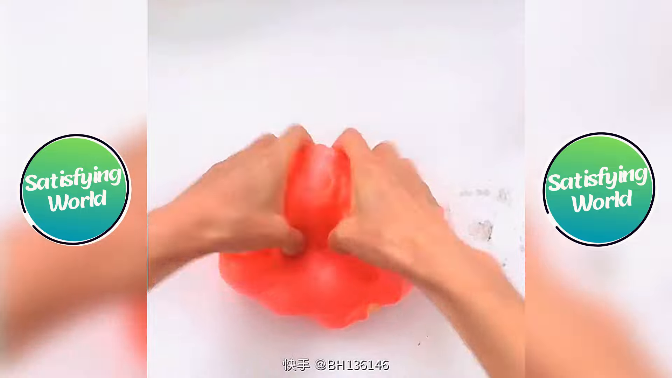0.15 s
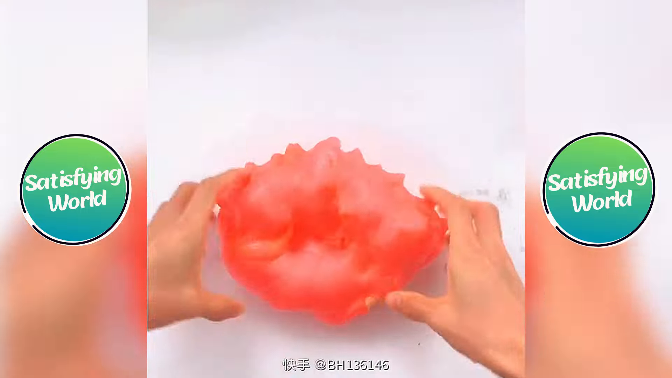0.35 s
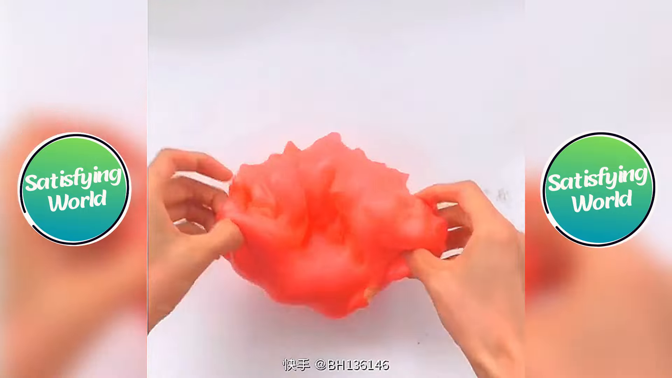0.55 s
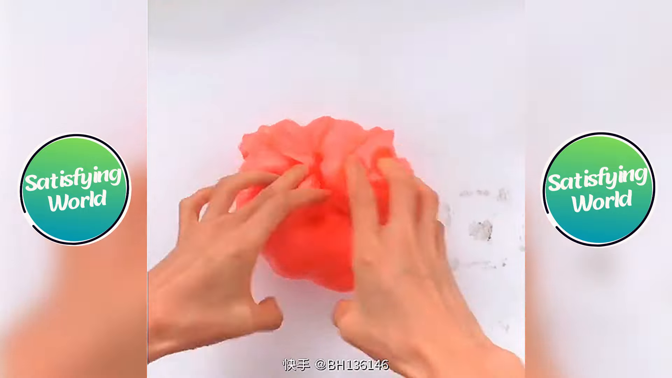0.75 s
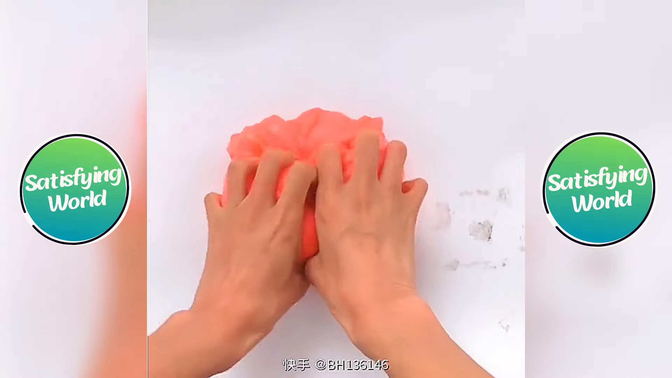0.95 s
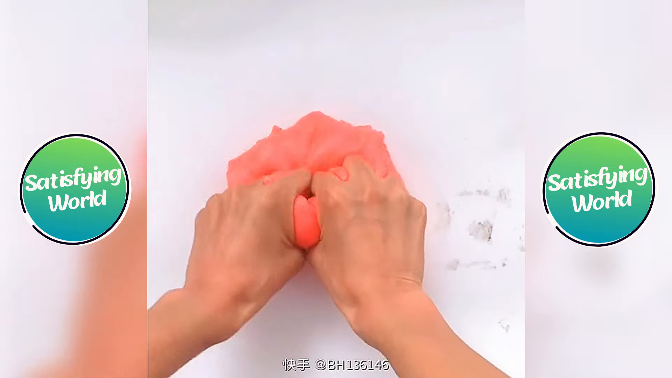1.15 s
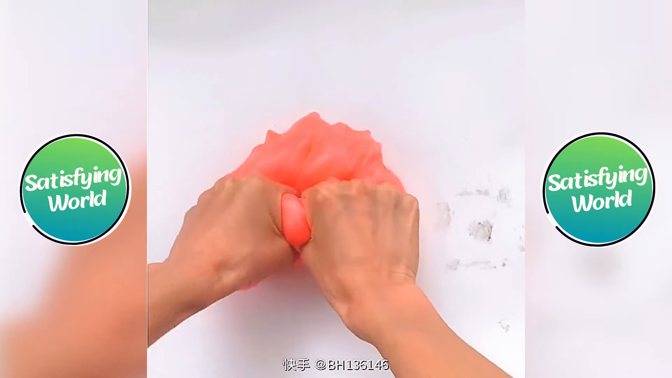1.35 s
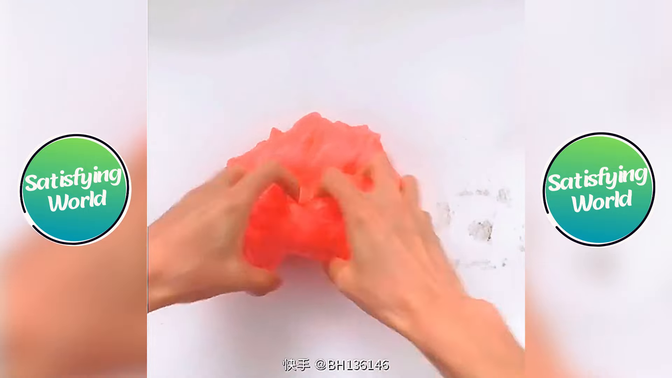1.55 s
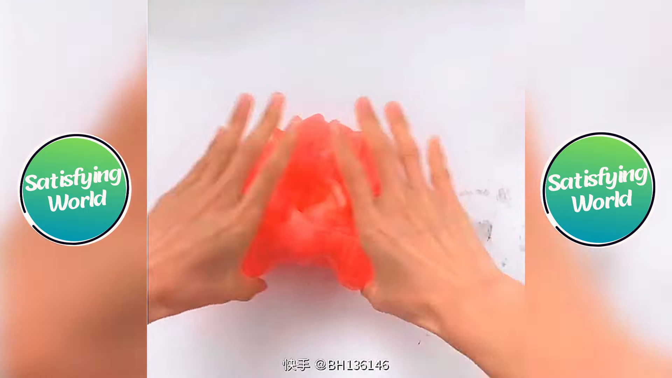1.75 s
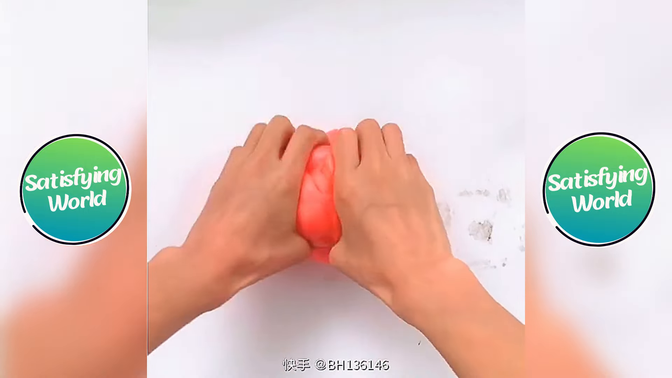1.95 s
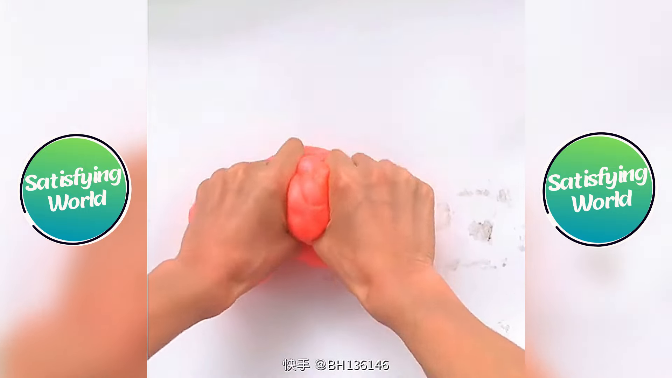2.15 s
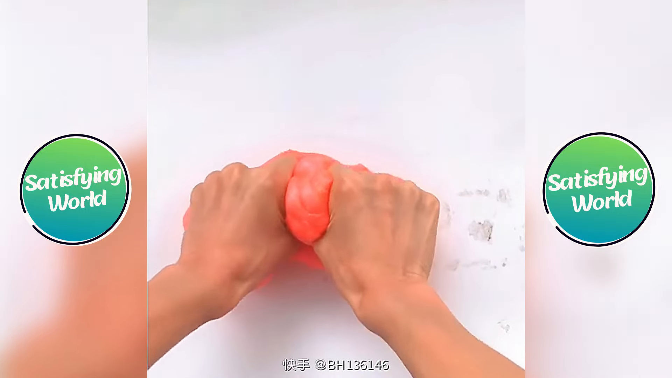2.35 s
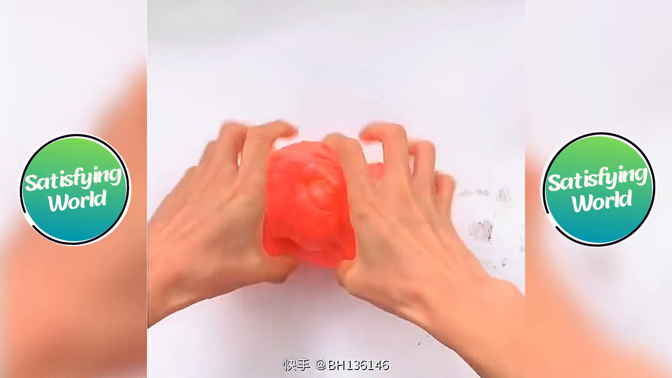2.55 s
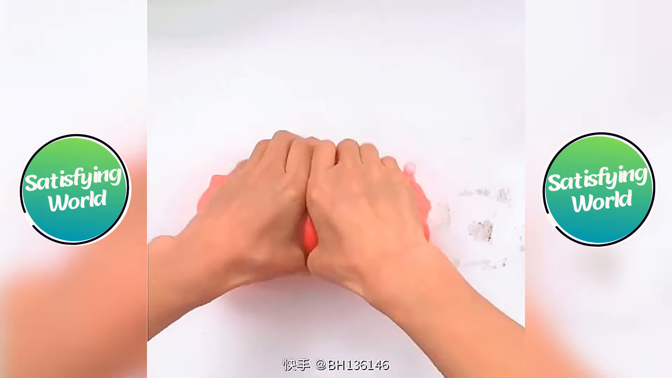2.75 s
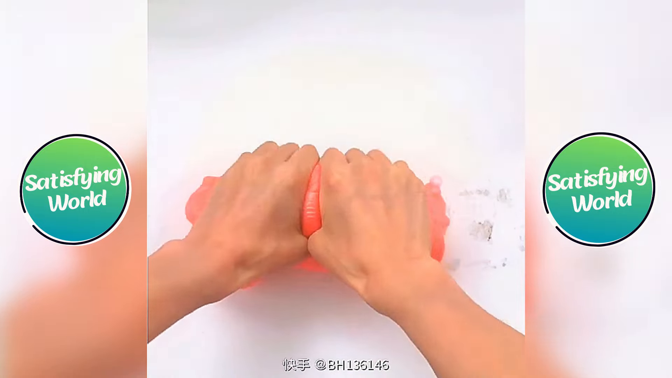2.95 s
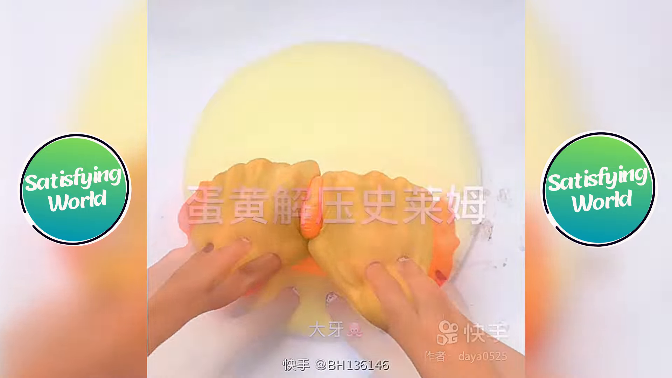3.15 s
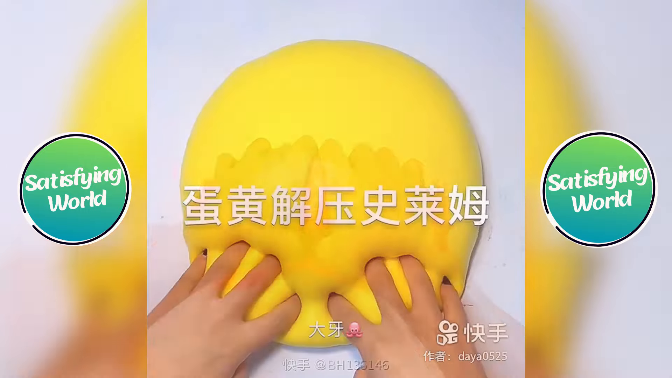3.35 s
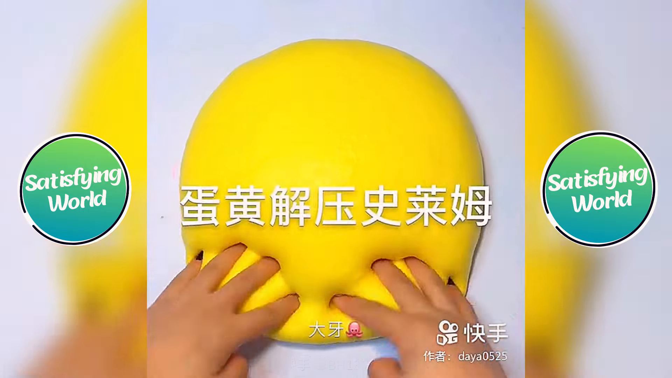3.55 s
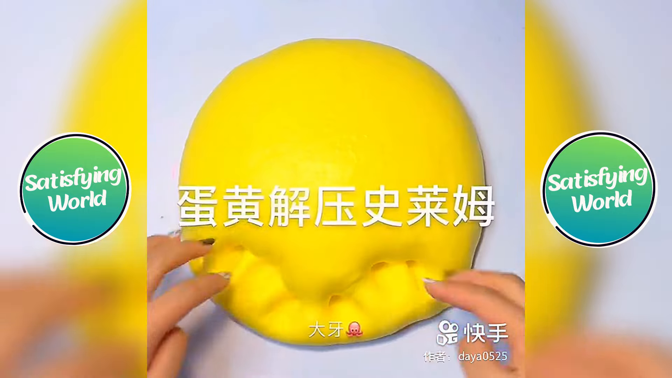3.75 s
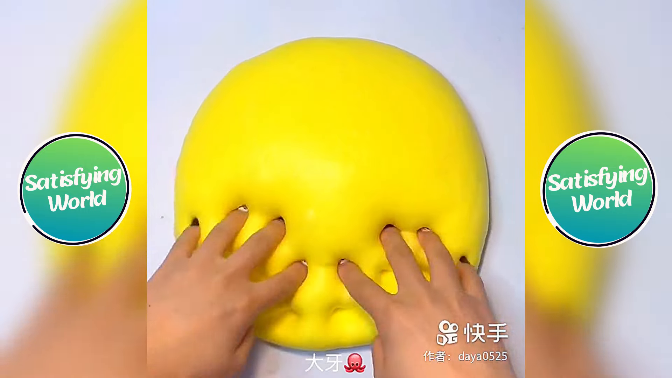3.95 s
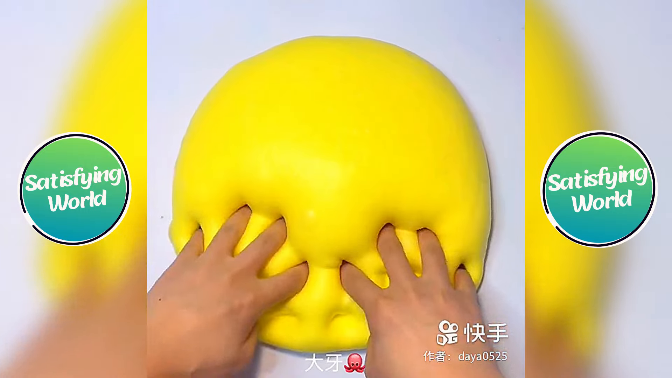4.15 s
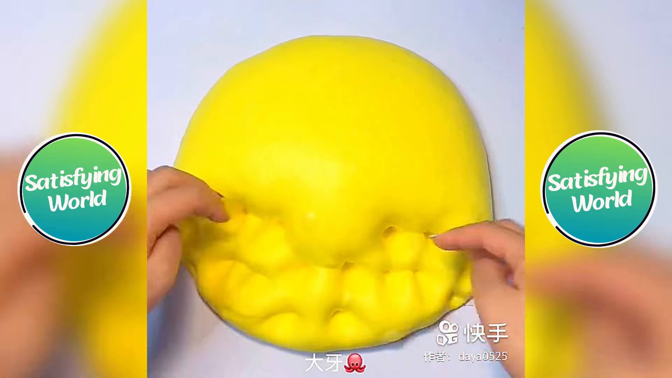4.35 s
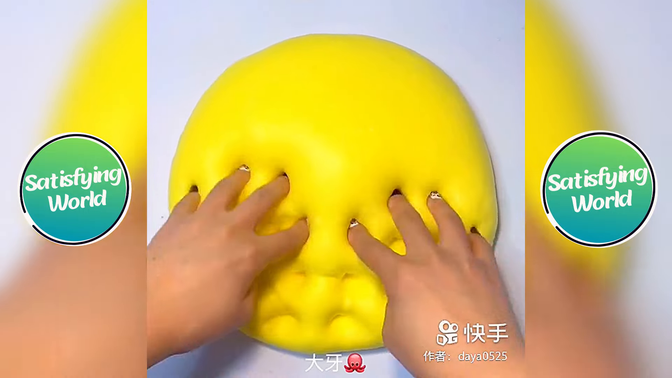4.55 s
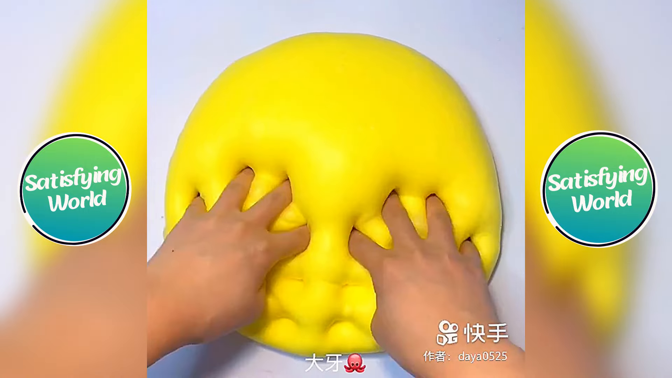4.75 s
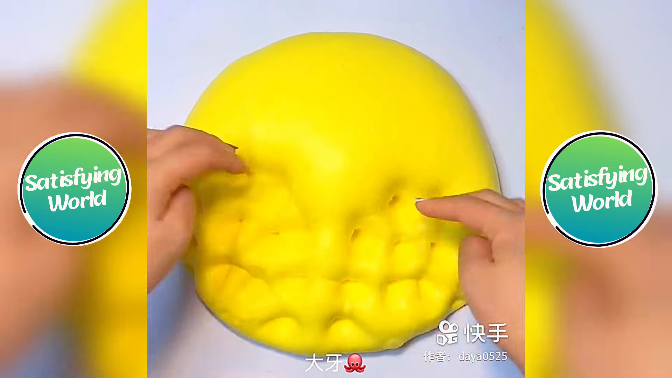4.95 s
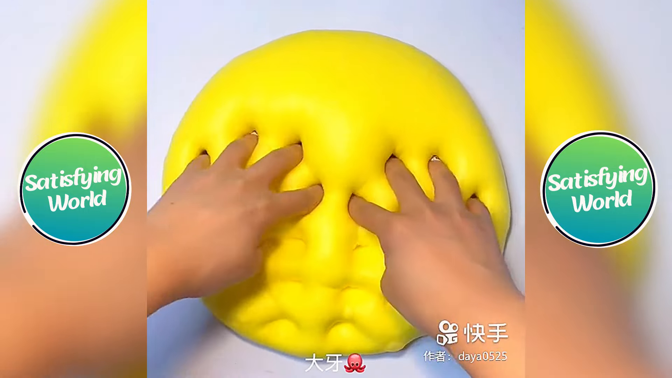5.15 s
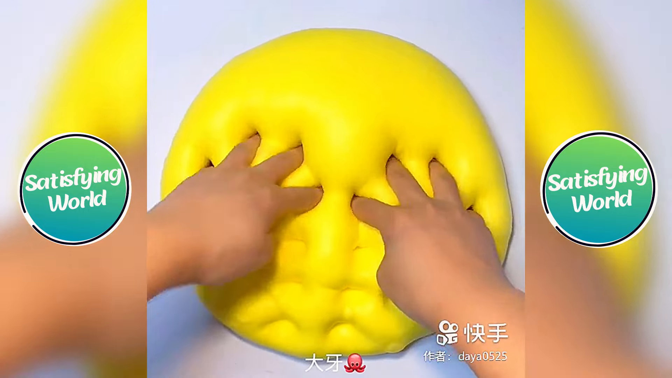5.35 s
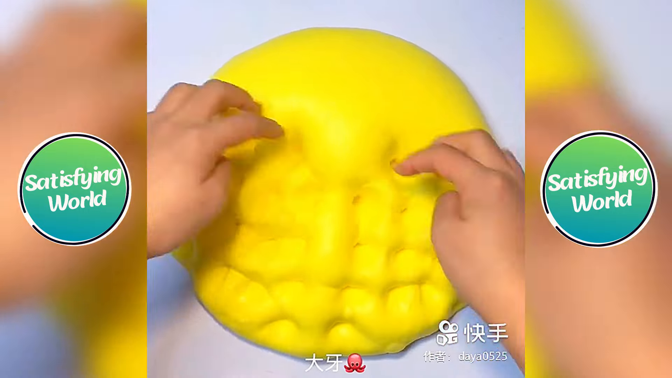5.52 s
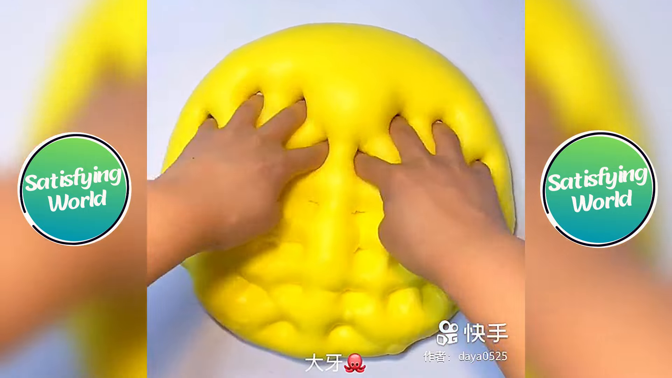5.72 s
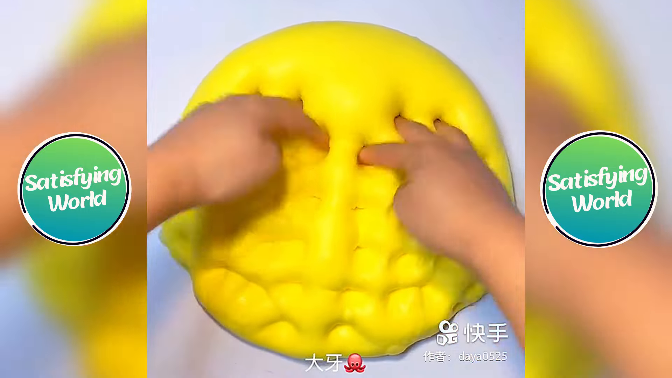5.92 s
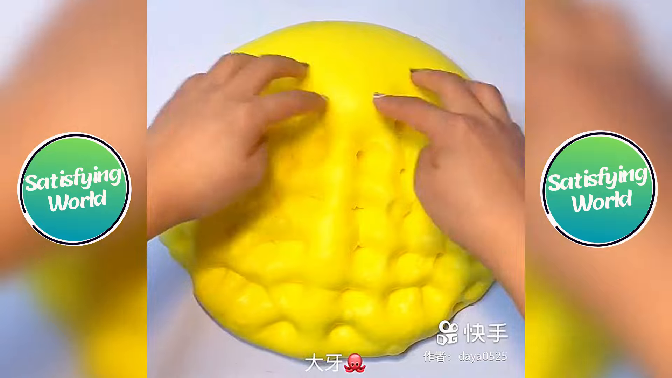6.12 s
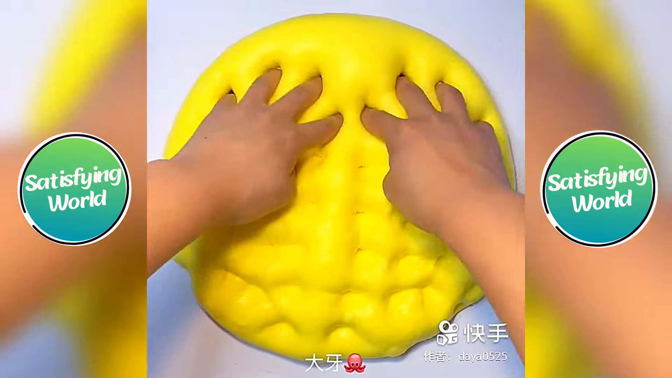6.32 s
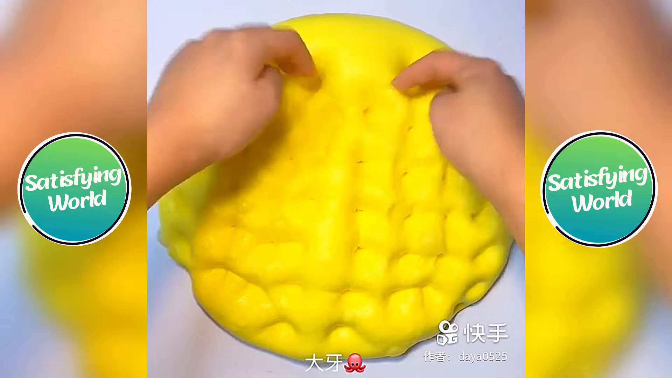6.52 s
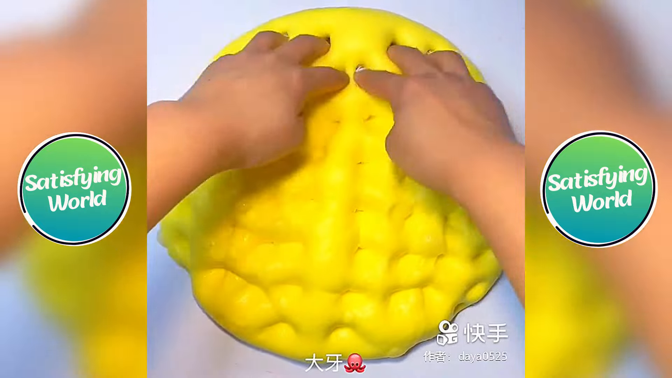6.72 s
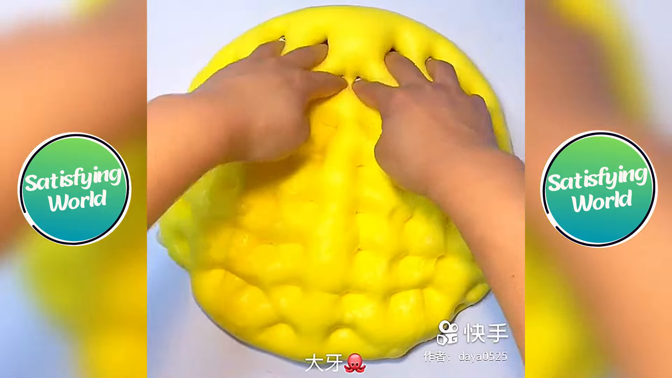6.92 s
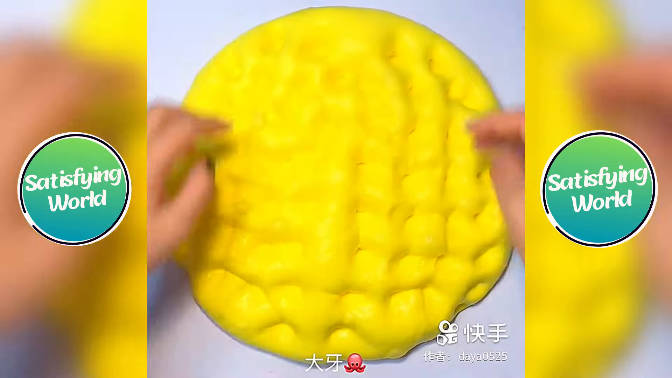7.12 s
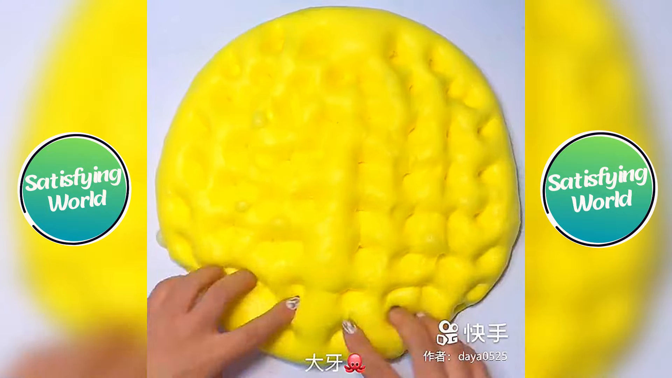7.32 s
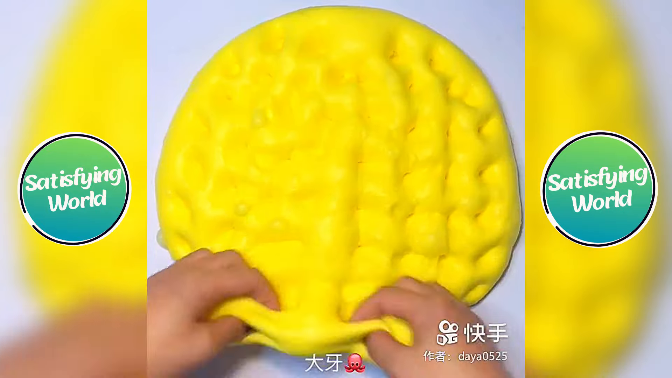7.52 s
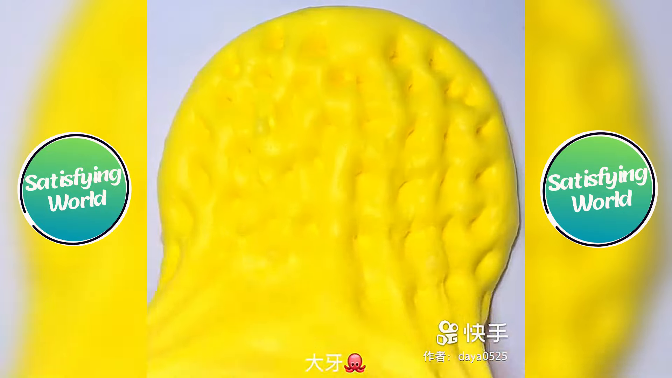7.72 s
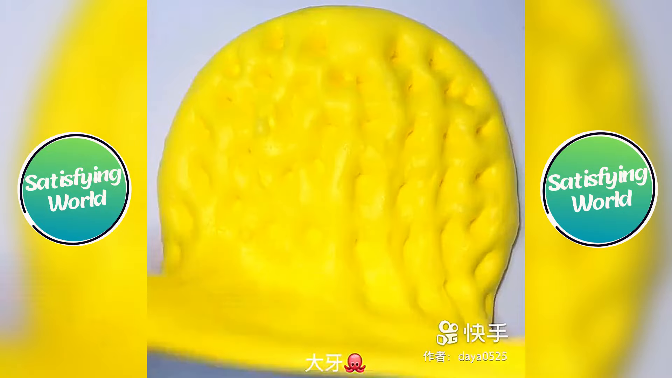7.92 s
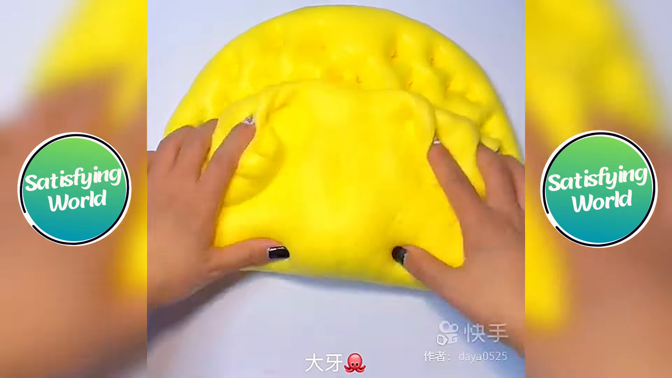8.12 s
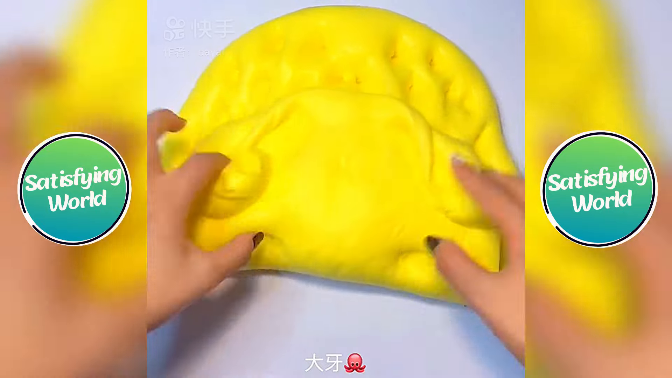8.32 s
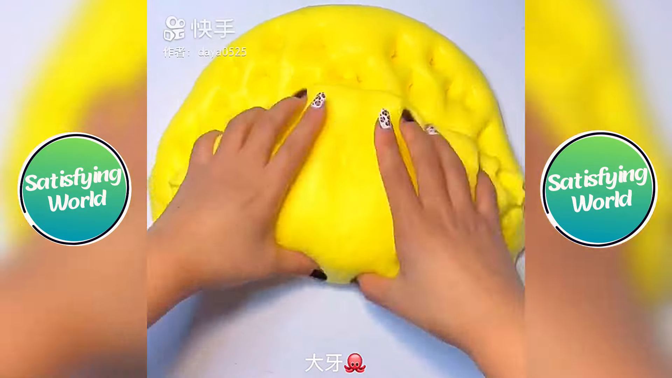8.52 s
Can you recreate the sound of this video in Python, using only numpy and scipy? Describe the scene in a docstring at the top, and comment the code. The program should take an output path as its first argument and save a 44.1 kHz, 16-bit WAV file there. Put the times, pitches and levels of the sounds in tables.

```python
"""Two hands knead a wet slime on a table: filtered ruptures squelch and crackle, and small air bubbles snap.
Then fingers sink into a thick, fluffy slime and pull out seven times; each hole opens with loud suction pops,
made of a rip of noise, a falling cavity note and a thud, and a hollow note lingers after the last three pulls.
The slab is peeled off the table and flopped over. A soft hush runs throughout; in the thick slime's part the
small room also rings low, and the close microphone overloads on the loudest pops."""
import sys
import numpy as np
from scipy import signal
from scipy.fft import rfft, irfft
from scipy.io import wavfile
from scipy.ndimage import uniform_filter1d

SR = 44100
rng = np.random.default_rng(int(sys.argv[2]) if len(sys.argv) > 2 else 0)


def persist_wave(psi):
    """Save psi, clipped to +-1, as 16-bit WAV."""
    counts = np.round(np.clip(psi, -1, 1) * 32767).astype(np.int16)
    wavfile.write(sys.argv[1], SR, np.atleast_2d(counts).T)


N = 378378

# Suction pops and slaps, with levels before the common gains of the layers that use them.
# Each row: start in seconds, tear level in dB, tear pitch in Hz, cavity level in dB, cavity pitch in Hz.
SUCTION_POPS = [(3.6678, -8.5, 2600, -11.5, 320), (3.6986, -6, 5260, -16.5, 365),
                (3.7097, -8.5, 7900, -20.5, 478), (3.714, -8.5, 8660, -19, 484),
                (3.7215, -17, 6050, -14.5, 294), (3.74, -8, 5245, -14.5, 454), (4.359, -2, 6150, -13, 513),
                (4.3853, -13, 2200, -22, 486), (4.401, -12.5, 7300, -21, 530),
                (4.4064, -6.5, 7250, -12, 348), (4.427, -13.5, 7120, -15.5, 248),
                (4.9576, -6, 9040, -11, 333), (4.9824, -3.5, 6810, -10.5, 285),
                (5.004, -11, 3320, -8.5, 335), (5.0136, -8.5, 6530, -36, 474), (5.5113, -9, 8030, -14, 309),
                (5.5289, -6, 7380, -9.5, 214), (5.545, -7.5, 4970, -11, 223),
                (5.5555, -7.5, 5460, -11, 426), (5.58, -11, 5490, -29, 203), (5.603, -24, 1060, -16, 325),
                (6.0444, -7.5, 4125, -7, 228), (6.057, -6, 8000, -19, 313), (6.066, -9, 6210, -8, 212),
                (6.0765, -7, 7980, -10, 391), (6.0913, -8, 7860, -14, 473),
                (6.116, -11.5, 1440, -13.5, 443), (6.581, -7, 6440, -13.5, 289),
                (6.585, -14.5, 5710, -17.5, 344), (6.6033, -9.5, 1166, -6, 424),
                (6.605, -10.5, 9000, -19, 430), (6.6137, -6, 6670, -21, 366), (6.626, -12, 7110, -5.5, 399),
                (6.6469, -9, 8300, -12, 530), (7.0744, -8.5, 6300, -7, 400), (7.0927, -14, 6520, -7, 410),
                (7.103, -9, 1360, -12.5, 427), (7.1233, -11.5, 1924, -10, 574),
                (7.608, -22, 3310, -22.5, 460), (7.614, -21.5, 3700, -12.5, 502),
                (8.167, -16, 1150, -17, 418), (8.1737, -5.5, 3300, -6.5, 279.6),
                (8.189, -15.5, 1310, -1.5, 190), (8.438, -22, 1640, -21, 184),
                (8.456, -23.5, 1100, -12, 205)]
# Spectrum of a rip in the thick film. Each row: frequency in Hz, relative density in dB per Hz.
THICK_TEAR_COLOUR = [(300, 1.5), (780, -5), (1250, 6), (2500, -2.5), (5000, 1), (8500, -1), (11000, -5.5),
                     (15500, -16)]
# The thick slime takes over from the wet one between these times in seconds.
CHANGE_START_S, CHANGE_END_S = 3.08, 3.62


def from_db(db):
    """Level to amplitude: 20 dB is a factor of ten."""
    return 10 ** (np.asarray(db) / 20)


def rms_one(x):
    """Normalisation of effective value: scale to an rms of 1."""
    return x / np.sqrt(np.mean(x ** 2) + 1e-20)


def at_hz(points, hz):
    """Logarithmic frequency scale: interpolate a table evenly per octave."""
    frequencies, values = np.transpose(points)
    return np.interp(np.log(np.maximum(hz, 1)), np.log(frequencies), values)


def coloured(x, spectrum):
    """Minimum-phase filtering: the folded cepstrum of a spectrum gives a causal response; rms 1."""
    size = 4096
    gain = from_db(at_hz(spectrum, np.fft.rfftfreq(size, 1 / SR)))
    cepstrum = irfft(np.log(gain))
    folded = np.r_[cepstrum[0], 2 * cepstrum[1:size // 2]]
    response = irfft(np.exp(rfft(folded, size)))
    return rms_one(signal.fftconvolve(x, response)[:len(x)])


def drift(rate):
    """Slow random modulation: straight lines join `rate` random levels a second; rms 1."""
    knots = rng.standard_normal(int(N / SR * rate) + 2)
    return rms_one(np.interp(np.arange(N) / SR * rate, np.arange(len(knots)), knots))


def resonance(x, hz, width):
    """Damped oscillator: a two-pole resonance, bandwidth in Hz, with a gain of 1 at its peak."""
    radius = np.exp(-np.pi * width / SR)
    feedforward = np.array([1, 0, -1]) * (1 - radius ** 2) / 2
    feedback = [1, -2 * radius * np.cos(2 * np.pi * hz / SR), radius ** 2]
    return signal.lfilter(feedforward, feedback, x + 1e-18)


def add(out, s, sound):
    """Superposition: mix a sound into out from time s."""
    start = max(round(s * SR), 0)
    out[start:start + len(sound)] += sound[:max(N - start, 0)]


def hush(thick):
    """Stationary noise: one shaped background crossfades into another."""
    # Background spectra. Each row: frequency in Hz, relative density in dB per Hz.
    wet_colour = [(25, -20), (60, 5.5), (150, 3), (900, -15), (4000, -19.5), (15500, -38)]
    thick_colour = [(25, -21.5), (70, -5), (170, -2), (450, -9.5), (1100, -18.5), (2500, -24.5),
                    (9000, -26.5), (15500, -34.5)]
    wet_hush = from_db(-61.5) * coloured(rng.standard_normal(N), wet_colour)
    thick_hush = from_db(-51) * coloured(rng.standard_normal(N), thick_colour)
    return (1 - thick) * wet_hush + thick * thick_hush


def reflections(near_db, tail_db, bass_db, count=9):
    """Reverberation: quick reflections off table and hands, then a diffuse tail decaying band by band."""
    # Room decay. Each row: frequency in Hz, time to fall by 60 dB in seconds.
    decay_times = [(150, 0.44), (700, 0.21), (5000, 0.24), (13000, 0.19)]
    t = np.arange(SR // 2) / SR
    hz = np.fft.rfftfreq(len(t), 1 / SR)
    white = rfft(rng.standard_normal(len(t)))
    centres = np.geomspace(80, 15000, count)
    tail = 0
    for centre, share in zip(centres, np.eye(count)):
        band = irfft(white * at_hz(np.c_[centres, share], hz), len(t))
        lift_db = bass_db * (centre < 1000)
        tail = tail + band * from_db(lift_db - 60 * t / at_hz(decay_times, centre))
    tail = tail * (1 - np.exp(-(t / 0.003) ** 2))
    near = rng.standard_normal(len(t)) * (t > .001) * np.exp(-t / 0.0057)
    return from_db(near_db) * near / np.linalg.norm(near) + from_db(tail_db) * tail / np.linalg.norm(tail)


def room(x, near_db, tail_db, bass_db, count=2):
    """Impulse-response convolution: the source wanders between places with reflections of their own."""
    shares = np.array([drift(rate=40) for _ in range(count)])
    shares = shares / np.linalg.norm(shares, axis=0)
    wet = 0
    for share in shares:
        wet = wet + signal.oaconvolve(x * share, reflections(near_db, tail_db, bass_db))[:N]
    return x + wet


def standing_waves(x):
    """Room modes: loud pops leave the room's low notes humming."""
    # Each row: frequency in Hz, gain at resonance in dB, time to fall by 60 dB in seconds.
    modes = [(149.5, 8.5, 0.56), (213.7, 12, 0.19), (341.6, 0, 0.19), (485.3, 1, 0.26), (599, -1.5, 0.18)]
    hum = 0
    for hz, db, t60 in modes:
        hum = hum + from_db(db) * resonance(x, hz, width=np.log(1000) / np.pi / t60)
    return hum


def hollow():
    """Free decay: something hollow rings on after the last three pulls, building up and dying away."""
    # Each row: start in seconds, pitch in Hz, level in dB, time to fall by 60 dB in seconds.
    notes = [(6.09, 361, -26, 0.54), (6.63, 375.4, -31.5, 0.63), (7.12, 381, -32, .62)]
    out, t = np.zeros(N), np.arange(SR) / SR
    for s, hz, db, t60 in notes:
        envelope = from_db(db - 60 * t / t60) * (1 - np.exp(-t / .02))
        add(out, s, np.sqrt(2) * envelope * np.sin(2 * np.pi * hz * t))
    return out


def grains(per_s, spread_db):
    """Random point process: tiny ruptures of uneven size strike at random moments."""
    sizes = from_db(spread_db * np.minimum(rng.exponential(1, N), 4))
    signs = rng.choice([-1, 1], N)
    return sizes * signs * (rng.random(N) < per_s / SR)


def foam(per_s, spread_db, low_hz, high_hz, cycles, count=18):
    """Impulse excitation: each rupture rings a pore, one of `count` sizes, for a few cycles; rms 1."""
    clicks = grains(per_s, spread_db)
    dealt = rng.integers(0, count, N)
    ringing = 0
    for k, hz in enumerate(np.geomspace(low_hz, high_hz, count)):
        ringing = ringing + resonance(clicks * (dealt == k), hz, hz / cycles)
    return rms_one(ringing)


def rub():
    """Stick-slip friction: skin slips over the slime in tiny jerks that ring one narrow resonance."""
    # Each row: time at the height in seconds, swell length in seconds, level in dB, pitch in Hz, width in Hz.
    strokes = [(.54, 0.054, -50.5, 1410, 230), (7.5, 0.057, -36.5, 1420, 560)]
    out, t = 0, np.arange(N) / SR
    for s, length, level_db, hz, width in strokes:
        jerks = grains(per_s=2200, spread_db=2.5)
        slips = rms_one(resonance(resonance(jerks, hz, 2 * width), hz, 2 * width))
        out = out + from_db(level_db) * slips * np.exp(-((t - s) / length) ** 2)
    return out


def gulp():
    """Cavity resonance: a pocket of air widens around a sinking finger, so its note falls."""
    start_s, length_s, level_db, start_hz = 6.914, .055, -35, 315
    age = np.maximum(np.arange(N) / SR - start_s, 0) / length_s
    phase = 2 * np.pi * np.cumsum(start_hz * np.exp(-.5 * age)) / SR
    envelope = np.minimum(10 * age, 1) * np.exp(-age ** 2)
    return from_db(level_db) * envelope * np.sin(phase)


def handwork():
    """Addition of powers: moves of hands and film swell and fade; sums drive press, squelch and crackle."""
    # The fading end of a snap, then squeezes, grips and folds, before the layer gains. Each row: time at the
    # height in seconds, length in seconds, pressing level in dB, squelching level in dB, crackling level in dB.
    squeezes = [(0.005, 0.045, -58, -50, -32.5), (0.097, 0.092, -44.5, -44.5, -44),
                (0.325, 0.036, -43, -45, -44), (0.487, 0.23, -58, -57, -56),
                (0.646, 0.074, -52.5, -55, -60), (0.827, 0.11, -63, -56.5, -51.5),
                (1.035, 0.21, -54.5, -51, -47), (1.145, 0.039, -58, -51, -45),
                (1.225, 0.1, -56, -52.5, -49), (1.304, 0.032, -57, -49, -60),
                (1.506, 0.11, -42.5, -45, -45.5), (1.651, .04, -56, -54.5, -57.5),
                (1.759, 0.057, -52.5, -55, -69), (1.866, 0.065, -52, -59, -57),
                (2.06, 0.34, -55.5, -54.5, -49.5), (2.21, 0.07, -61, -58, -45),
                (2.462, 0.16, -51, -49, -48), (2.703, 0.03, -38.5, -45.5, -44.5),
                (2.797, 0.14, -62, -50.5, -46.5), (3.04, 0.16, -57, -54.5, -47.5),
                (3.225, .05, -51, -66, -61), (3.321, 0.1, -46.5, -47.5, -49),
                (5.412, 0.03, -43, -38.5, -41), (7.468, 0.063, -40, -42, -44.5),
                (7.523, 0.094, -29.5, -35, -41.5), (8.115, 0.11, -46, -39, -37),
                (8.3, 0.067, -52, -48, -42), (8.419, .06, -28, -35, -32)]
    # Fingers sinking into the thick slime. Each row: time at the height in seconds, level in dB before the mix.
    pokes = [(4.12, -55), (4.75, -50.5), (5.27, -51), (5.86, -48), (6.34, -49), (6.841, -49)]
    # Film straining as fingers start to lift. Each row: time at the height in seconds, level in dB before the mix.
    strains = [(3.669, -49), (4.359, -36), (4.958, -32.5), (5.51, -33), (6.044, -31.5), (6.58, -32.5),
               (7.074, -40.5)]
    rise_share = 0.53   # part of a row's length spent building up
    swell_shape = 1.35   # 1 is pointed, 2 is round
    # each move: time at the height (s), rise (s), fall (s), levels of (pressing, squelching, crackling) in dB
    moves = [(s, length * rise_share, length * (1 - rise_share), mix) for s, length, *mix in squeezes]
    moves += [(s, 0.067, 0.085, np.add((3.6, -0.74, -1), db)) for s, db in pokes]
    moves += [(s, 0.023, 0.027, np.add((-4.5, -1.5, 0), db)) for s, db in strains]
    # shreds of film part after every pop, at levels set against its tear
    moves += [(s, 0.0026, 0.019, np.add((-21.5, -20, -16), db)) for s, db, *_ in SUCTION_POPS]
    peel = (7.63, 0.035, 0.11, (-39, -35.5, -33.5))   # the slab comes off the table
    stretch = (7.87, .11, .22, (-73, -69, -50))
    moves += [peel, stretch]
    t, power = np.arange(0, N / SR, .001), 0
    for s, rise, fall, mix in moves:
        swell = np.exp(-np.maximum((s - t) / rise, (t - s) / fall) ** swell_shape)
        power = power + np.outer(from_db(mix), swell) ** 2
    return [np.interp(np.arange(N) / SR, t, np.sqrt(p)) for p in power]


def kneading(thick):
    """Granular excitation: palms press dully, wet folds squelch, sticky threads crackle and tick as they part."""
    # Spectra of the layers. Each row: frequency in Hz, relative density in dB per Hz.
    press_colour = [(45, -24), (190, -1), (450, 1), (750, -10), (1500, -32)]
    squelch_colour = [(400, -16.5), (900, 0), (1400, 0), (2300, -3.5), (3800, -6), (7000, -25.5)]
    wet_crackle_colour = [(1800, -30), (4000, 1.5), (8000, -0.5), (13000, 0.5)]
    thick_crackle_colour = [(2000, -20.5), (4500, -1), (7500, -0.5), (10000, -4.5), (15500, -11)]
    pressing, squelching, crackling = handwork()
    press = pressing * from_db(-3.5) * coloured(grains(per_s=1300, spread_db=-1.5), press_colour)
    pores = foam(per_s=1100, spread_db=4.5, low_hz=749, high_hz=5530, cycles=2.9)
    squelch = squelching * from_db(-1.5 + 3.0 * drift(rate=60)) * coloured(pores, squelch_colour)
    threads = foam(per_s=3200, spread_db=1.5, low_hz=3200, high_hz=16000, cycles=3)
    # now and then a thicker thread lets go with a tick about a millisecond long
    tick_decay = np.exp(-1 / (.0008 * SR))
    ticks = signal.lfilter([1], [1, -tick_decay], np.abs(grains(per_s=40, spread_db=2)) + 1e-18)
    threads = threads + .8 * rms_one(ticks * rng.standard_normal(N))
    wet_crackle = (1 - thick) * coloured(threads, wet_crackle_colour)
    crackle = wet_crackle + thick * coloured(threads, thick_crackle_colour)
    return press + squelch + crackling * from_db(-1.5 + 2.0 * drift(rate=72)) * crackle


def ragged(size, rough_db):
    """Intermittent fracture: a film gives way strand by strand, as noise of jumping strength."""
    strength = rms_one(uniform_filter1d(rng.standard_normal(size), size=12))
    return rng.standard_normal(size) * from_db(rough_db * np.clip(strength, -2, 2))


def tear(noise, t, hz, length, whistle, fall, fizz_db, fizz_s):
    """Jet noise: air rushes through a slit whose pitch drops as it widens; the torn edge fizzes on."""
    pitch = np.minimum(hz * np.exp(fall * (.5 - np.minimum(t / length, 2))), .4 * SR)
    # a random walk of phase roughens the whistle
    wobble = np.cumsum(rng.standard_normal(len(t))) * np.sqrt(hz / SR) * 1.085
    slit = np.sqrt(2) * np.sin(2 * np.pi * np.cumsum(pitch) / SR + wobble)
    rush = np.exp(-(t / length) ** 2) * (noise + whistle * slit) / np.hypot(1, whistle)
    fizz = from_db(fizz_db) * np.exp(-t / fizz_s) * noise[::-1]
    return (1 - np.exp(-t / 0.00067)) * (rush + fizz)


def cavity(t, hz, opening, start_hz, cycles, sag):
    """Cavity resonance: the air pocket's note plunges as the hole opens, then sags and dies in a few cycles."""
    sagging = hz * (1 + sag * (2 * np.exp(-t / (2 * opening)) - 1))
    pitch = sagging + start_hz * np.exp(-t / (opening * 0.3055))
    swell = 1 - np.exp(-(t / (opening * 0.45)) ** 2)
    fade = np.exp(-np.maximum(t - opening * 1.58, 0) * hz / cycles)
    return np.sqrt(2) * swell * fade * np.sin(2 * np.pi * np.cumsum(pitch) / SR)


def snaps(size=2048):
    """Bubble bursting: surface bubbles mostly rip, buried air pockets mostly plop."""
    # Bubbles at the surface. Each row: start in seconds, tear level in dB before the gain, tear pitch in Hz.
    surface = [(0.3005, -35, 1460), (0.3899, -37.5, 13130), (0.4338, -37.5, 13300), (0.6774, -40, 10880),
               (0.7645, -33, 1940), (0.9073, -25.5, 13300), (0.9487, -30.5, 14200), (1.0203, -29.5, 13450),
               (1.038, -25.5, 3330), (1.1471, -18.5, 6216), (1.3297, -39, 13160), (1.3932, -39, 3200),
               (1.4026, -32.5, 5590), (1.5473, -33.5, 2880), (1.737, -43, 2500), (1.78, -39.5, 13380),
               (1.8585, -39, 13070), (1.929, -34.5, 6700), (1.9753, -17, 12490), (2.0145, -37, 9000),
               (2.0411, -27.5, 14200), (2.068, -22, 4940), (2.1252, -30.5, 3480), (2.1683, -29.5, 4490),
               (2.251, -40, 5200), (2.2759, -16, 6445), (2.7752, -33, 9500), (2.7933, -31, 13550),
               (2.8325, -19, 1605), (2.8331, -12.5, 8530), (2.9172, -16, 4400), (2.9189, -22.5, 1460),
               (2.9693, -32, 12900), (3.0016, -27, 12700), (3.0531, -23, 12960), (3.084, -28.5, 12840),
               (3.26, -34, 10000), (3.305, -35, 2800), (3.438, -45, 11000), (4.1409, -42.5, 6400),
               (4.329, -37.5, 1200), (4.6619, -55, 2780), (4.7664, -38, 8420), (4.8445, -45, 1850),
               (5.29, -32.5, 10000), (6.7905, -44, 1800), (6.8576, -43.5, 4030), (7.4167, -27.5, 1960),
               (7.451, -34.5, 6980), (7.4938, -24.5, 1450), (7.7061, -32.5, 6930), (7.775, -32.5, 5450),
               (7.7848, -34, 5980), (7.8725, -43.5, 5050), (7.9306, -46.5, 8100), (8.1002, -23.5, 6870),
               (8.1186, -26.5, 9060), (8.1557, -30, 3880), (8.3808, -29, 7260)]
    # Buried pockets. Each row: start in seconds, cavity level in dB before the gain, cavity pitch in Hz.
    buried = [(0.0936, -36.5, 392), (0.2998, -44, 175), (2.6926, -34, 320), (2.835, -36.5, 189),
              (4.174, -42.5, 1010), (4.329, -40.5, 240), (4.6619, -29, 830), (4.7162, -34.5, 630),
              (5.3988, -31, 366), (5.8445, -34, 226), (5.883, -33.5, 356), (6.358, -38, 332),
              (6.8577, -38.5, 221), (7.417, -34, 442), (7.5067, -23.5, 217), (7.5972, -27.5, 260)]
    # Spectrum of a rip in the wet film. Each row: frequency in Hz, relative density in dB per Hz.
    wet_tear_colour = [(300, -15.5), (1400, -2), (3000, 0.5), (6000, -1), (10000, -4), (15500, 4)]
    out, t = np.zeros(N), np.arange(size) / SR
    # a little hollow, of random pitch around 260 Hz, lies under each surface bubble
    bubbles = [(s, db, hz, db - 23, 260 * np.exp(rng.normal(0, .25))) for s, db, hz in surface]
    # a dull rip lies over each buried pocket
    bubbles += [(s, db - 3.5, 2200, db, hz) for s, db, hz in buried]
    strands = ragged(len(bubbles) * size, rough_db=5.5)
    wet = coloured(strands, wet_tear_colour).reshape(-1, size)
    thick = coloured(strands, THICK_TEAR_COLOUR).reshape(-1, size)
    for k, (s, tear_db, tear_hz, cavity_db, cavity_hz) in enumerate(bubbles):
        noise, length = (wet[k], .0024) if s < CHANGE_END_S else (thick[k], .0035)
        # the noise of a rip is dull above 1.9 times its pitch
        top_hz = min(1.9 * tear_hz, SR / 2 - 1000)
        noise = signal.sosfilt(signal.butter(2, top_hz, fs=SR, output="sos"), noise)
        rip = tear(noise, t, tear_hz, length, whistle=0.73, fall=0.391, fizz_db=-13.5, fizz_s=0.0071)
        plop = cavity(t, cavity_hz, opening=0.00407, start_hz=2384, cycles=0.91, sag=0.25)
        add(out, s, from_db(tear_db + 5.5) * rip + from_db(cavity_db - 1) * plop)
    return out


def pops(size=3072):
    """Suction release: each hole lets go with a rip, a hollow plop and a thud of the mass; slaps work alike."""
    out, t = np.zeros(N), np.arange(size) / SR
    air = coloured(ragged(len(SUCTION_POPS) * size, rough_db=4), THICK_TEAR_COLOUR).reshape(-1, size)
    thud_envelope = (1 - np.exp(-t / 0.0019)) * np.exp(-t / 0.0078)
    thud = from_db(-6.5) * np.sin(2 * np.pi * 165 * t) * thud_envelope
    for noise, (s, tear_db, tear_hz, cavity_db, cavity_hz) in zip(air, SUCTION_POPS):
        rip = tear(noise, t, tear_hz, length=0.003575, whistle=0.83, fall=0.325, fizz_db=-19.0, fizz_s=0.0075)
        plop = cavity(t, cavity_hz, opening=0.00398, start_hz=2600, cycles=1.11, sag=0.31)
        # holes with a higher note are smaller and shake the mass less: 8.5 dB per octave above 320 Hz
        shake = from_db(-8.5 * max(np.log2(cavity_hz / 320), 0))
        add(out, s, from_db(tear_db + 4.0) * rip + from_db(cavity_db - 3.5) * (plop + shake * thud))
    return out


def scene():
    """Superposition: both slimes, each in its room sound and over its own hush."""
    thick = np.interp(np.arange(N) / SR, [CHANGE_START_S, CHANGE_END_S], [0, 1])
    # holes this small radiate hardly any deep bass
    holes = signal.sosfilt(signal.butter(2, 90, "high", fs=SR, output="sos"), pops())
    slime = holes + snaps() + kneading(thick) + rub() + gulp()
    first = room(slime * (1 - thick), near_db=-26.5, tail_db=-9.5, bass_db=0.0)
    second = room(slime * thick, near_db=-8, tail_db=-11.0, bass_db=4.0)
    second = second + standing_waves(slime * thick) + hollow()
    return (first + second + hush(thick))[None]


def record(dry):
    """Saturation and band limiting: the loudest pops flatten at full scale; a steep low-pass cuts the top."""
    flattened = dry / (1 + dry ** 6) ** (1 / 6)
    low_pass = signal.ellip(10, .1, 70, 16100, fs=SR, output="sos")   # ripple dB, rejection dB, edge Hz
    return signal.sosfilt(low_pass, flattened)


dry = scene()
out = record(dry)
persist_wave(out)
```